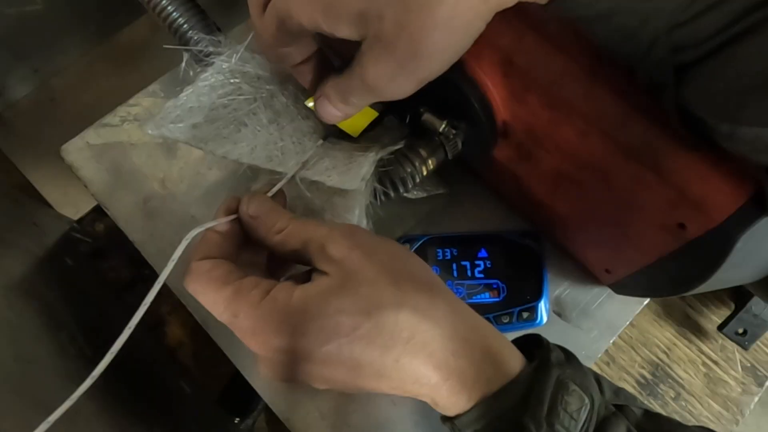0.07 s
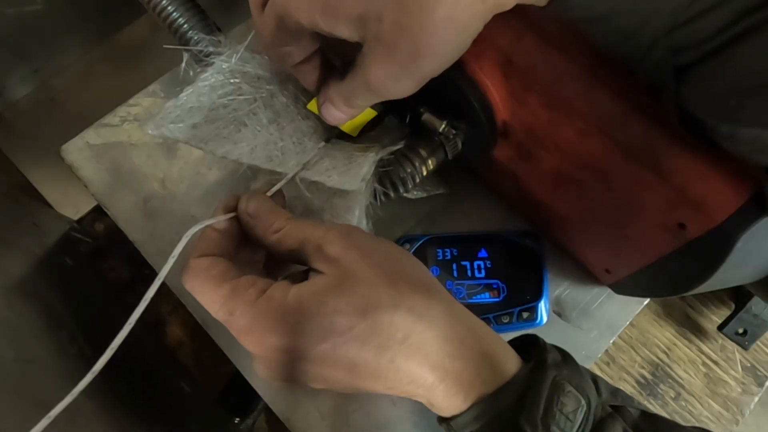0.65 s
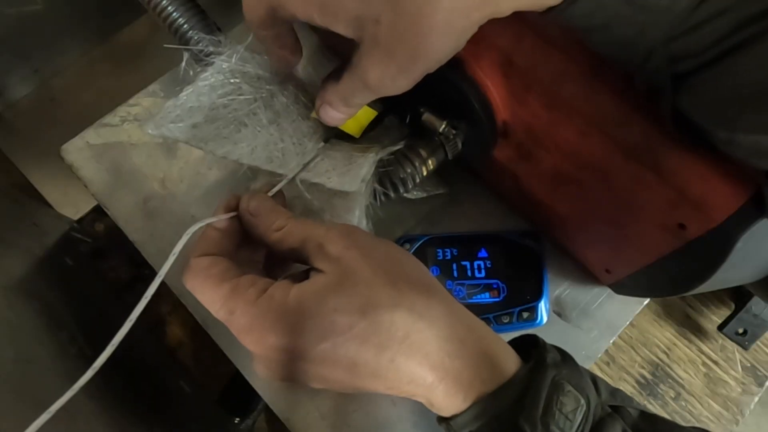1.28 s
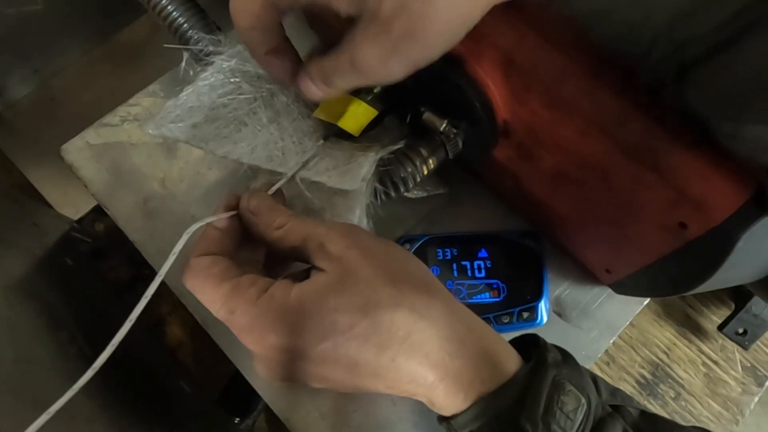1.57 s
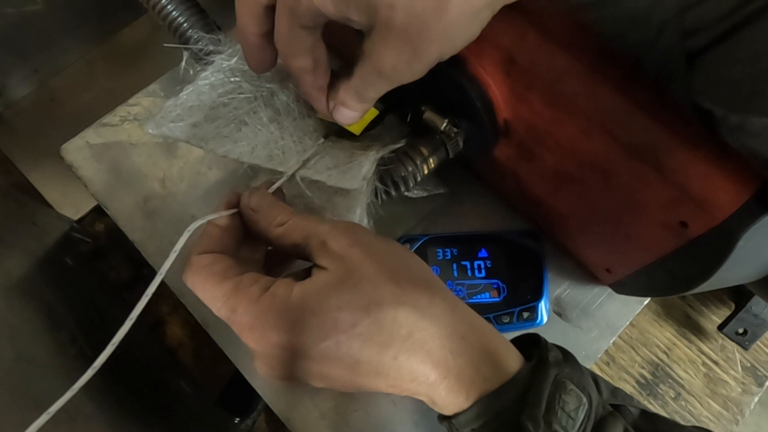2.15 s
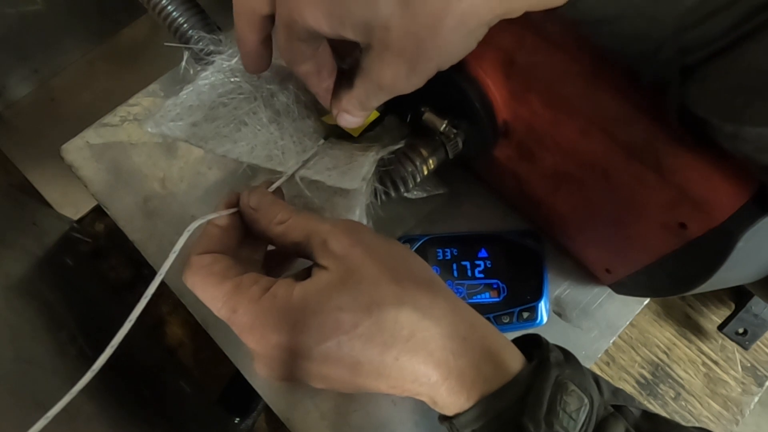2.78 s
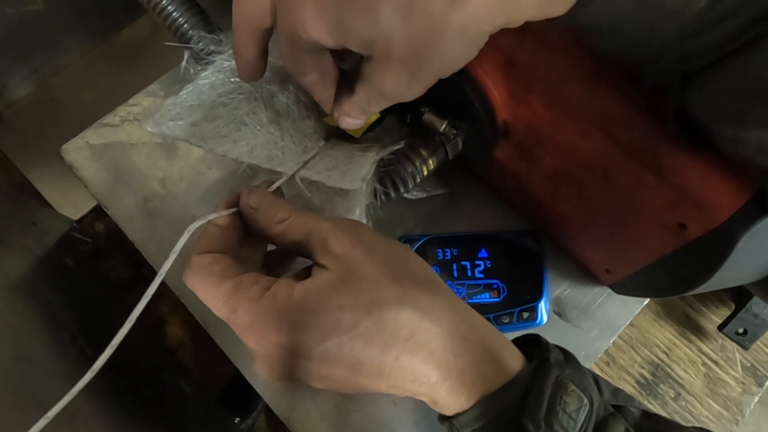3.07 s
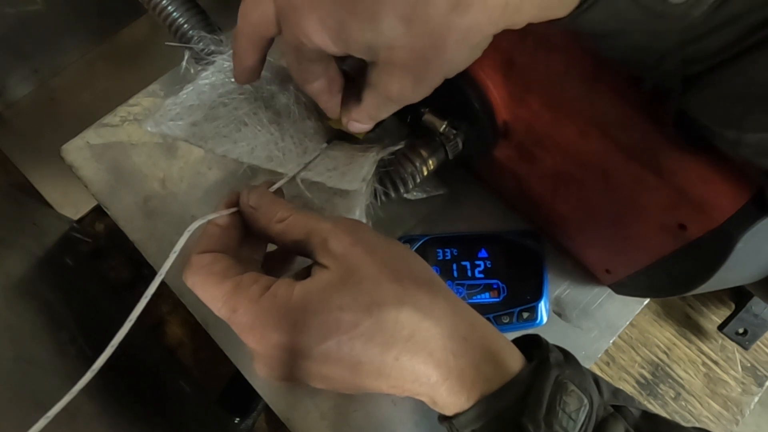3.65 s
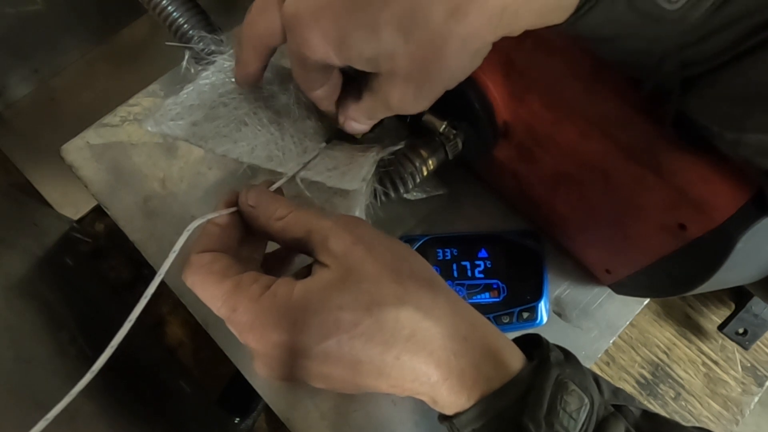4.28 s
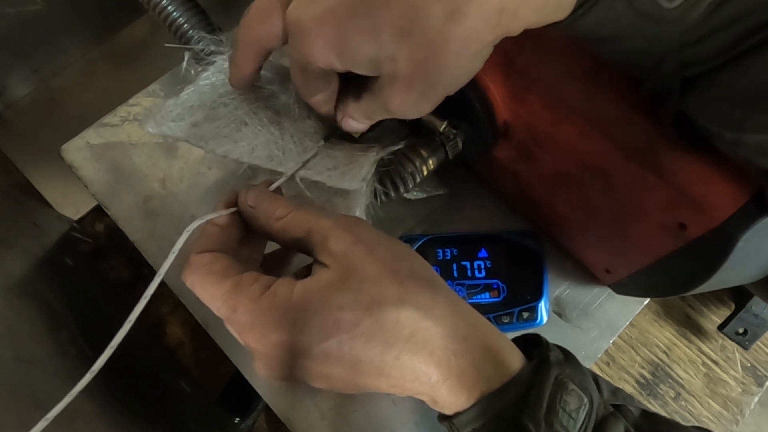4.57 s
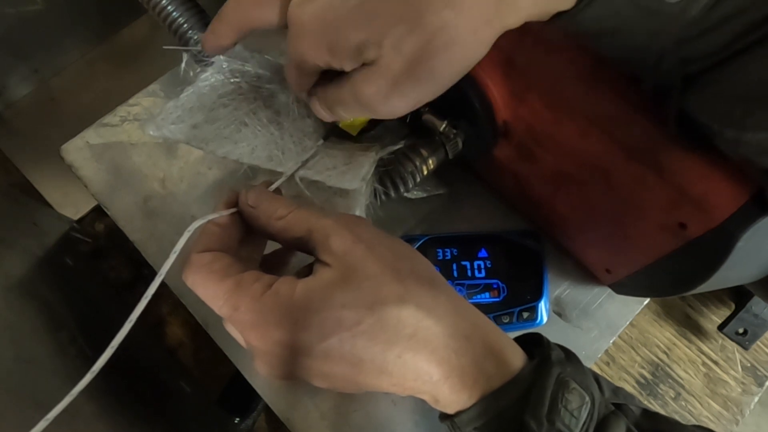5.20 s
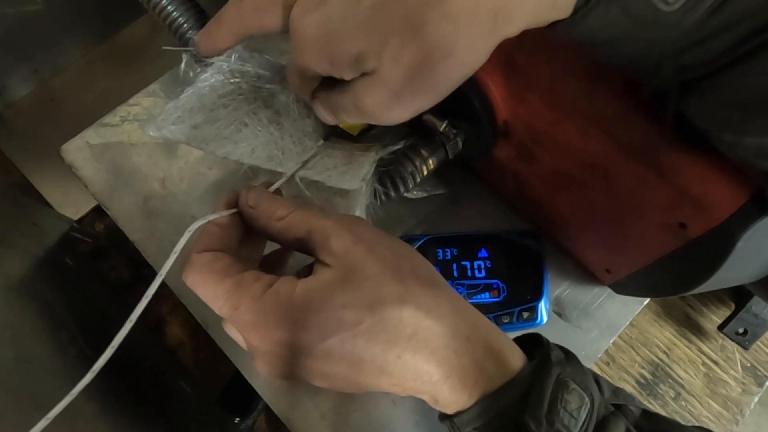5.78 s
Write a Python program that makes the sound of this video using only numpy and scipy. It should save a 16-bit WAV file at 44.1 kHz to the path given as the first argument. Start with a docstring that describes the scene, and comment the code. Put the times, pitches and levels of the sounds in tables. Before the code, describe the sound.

A diesel air heater burns close to the microphone in a workshop. Its flame makes a deep, throbbing rumble that falters briefly a few times a second and picks up again at once. Above it, the blower holds a steady, high, many-toned whine with rushing, hissing air. A faint airy whistle at the openings fades as a hand shields them, while the heater runs on.

```python
"""A diesel air heater's flame throbs on a low resonance of burner and exhaust pipe, close by.
It burns over a turbulent roar and falters a few times a second. The blower turns at about 4000 rpm
and whines in many shaft orders. Air rushes through it, hums in the duct, hisses in the housing
and whistles at the openings, which a hand gradually shields."""
import sys
import numpy as np
from scipy.fft import rfft, irfft, next_fast_len
from scipy.io import wavfile
from scipy.ndimage import map_coordinates

SR = 44100
rng = np.random.default_rng(int(sys.argv[2]) if len(sys.argv) > 2 else 0)


def int16_out(signal):
    """Quantize to a 16-bit WAV file."""
    q = np.round(np.clip(np.atleast_2d(signal).T, -1, 1) * 32767)
    wavfile.write(sys.argv[1], SR, q.astype(np.int16))


N = 266231


# Flame drive and pipe resonance: time_s, level_db, pitch_hz
BURN = [(0, -16, 95.4), (.5, -13.5, 95.5), (1.1, -18.5, 94.8), (1.45, -15.5, 95.33), (1.7, -17, 94.35),
        (2.45, -17, 93.3), (3.0, -14.5, 92.34), (3.45, -16.5, 92.9), (3.98, -18, 93.16), (4.22, -15, 97.6),
        (4.5, -17.5, 94.3), (5.0, -15, 93.16), (5.3, -17.5, 94.5), (5.6, -15, 95.4), (6.04, -13, 92.4)]

def flame_throb(sag_db, flutter_db=3.0, jitter_hz=3.74, overtone=0.92, ceiling_db=-12.5, side_db=-28):
    """The flame locks onto the pipe resonance; strong swings saturate."""
    level_db, pitch_hz = curves(BURN)
    drive = amp(level_db + sag_db + flutter_db * wobble(100)) * np.sqrt(2)
    swing = drive / (1 + (drive / amp(ceiling_db)) ** 4) ** (1 / 4)
    looseness = amp(-sag_db)  # a weak oscillation keeps time less well
    phase = 2 * np.pi * np.cumsum(pitch_hz + jitter_hz * looseness * wobble(70)) / SR
    throb = swing * np.cos(phase) - overtone * swing ** 2 * np.cos(2 * phase)  # sharp troughs
    side = amp(side_db) * swing * np.sin(phase)
    return np.array([throb + side, throb - side])


# Flame falters: start_s, depth_db, length_s
FALTERS = [(0.128, 10.5, 0.037), (0.284, 9.5, 0.053), (.6, 20, 0.073), (0.748, 12, 0.05),
           (0.833, 10, 0.063), (0.937, 8.5, 0.052), (1.165, 8, 0.072), (1.349, 11, 0.075),
           (1.628, 7.5, 0.075), (1.711, 7.5, 0.031), (1.802, 13.5, 0.036), (1.983, 6.5, 0.036),
           (2.214, 8, 0.043), (2.388, 8.5, 0.043), (2.681, 21, 0.049), (2.853, 13, 0.052),
           (2.938, 18.5, 0.066), (3.114, 15, 0.056), (3.627, 17, 0.047), (3.75, 9, 0.044),
           (4.015, 9, 0.037), (4.148, 8.5, 0.022), (4.301, 10, 0.083), (4.609, 8, 0.069),
           (4.731, 6.5, .055), (5.178, 9.5, 0.067), (5.348, 11, 0.16), (5.649, 22, 0.049),
           (5.788, 18.5, 0.099)]

def falter_db(flare_delay_s=0.065, flare_s=0.056, flare_share=0.17):
    """The flame sags at each falter, then the unburnt fuel flares up."""
    sag_db = np.zeros(N)
    for start_s, depth_db, length_s in FALTERS:
        centre_s = start_s + length_s / 2
        flare = flare_share * bump(centre_s + flare_delay_s, flare_s)
        sag_db += depth_db * (flare - bump(centre_s, length_s))
    return sag_db


# Combustion spectrum: freq_hz, density_db
ROAR = [(10, -33), (22, -12), (36, -10), (55, -4), (80, 0), (110, -1.5), (148, 0), (200, -10.5),
        (228, -11.5), (262, -15), (285, -18), (340, -23), (520, -36.5), (1000, -73)]

def flame_roar(sag_db):
    """Turbulent combustion, dipping slightly at each falter."""
    return amp(-24 + 0.084 * sag_db) * noise(spectrum(ROAR))


# Blower shaft speed: time_s, speed_hz
SHAFT_SPEED = [(0, 66.59), (.6, 66.55), (1.0, 66.68), (1.5, 66.75), (2.15, 66.51), (3.3, 66.57),
               (3.75, 66.69), (5.1, 66.735), (5.75, 66.56), (6.04, 66.6)]

def shaft_angle_rad():
    """The shaft turns at a slightly drifting speed."""
    return 2 * np.pi * np.cumsum(curves(SHAFT_SPEED)[0]) / SR


# Blower swell, scaled by each layer: time_s, level_db
SWELL = [(0, -33.5), (.8, -34), (1.3, -32), (1.75, -34), (2.8, -32.2), (3.45, -34.5), (3.95, -33.5),
         (4.5, -34), (5.15, -35), (5.5, -33.5), (6.04, -33.5)]
# Blower tones: shaft_order, level_db, left_minus_right_db
ORDERS = [(1, -36.2, 1), (4, -50.7, -2), (8, -57.3, 0), (9, -53.6, -4), (10, -55.1, -5), (11, -47.2, -6),
          (14, -55.4, -1), (15, -58.1, 0), (16, -58.5, -5), (17, -54.7, -7), (19, -59.6, 1), (20, -43.4, 2),
          (21, -53.6, 1), (22, -45.4, -3), (23, -41.7, -2), (24, -55.0, -2), (25, -60.0, -1),
          (26, -53.2, 0), (27, -57.7, 1), (29, -61.4, 2), (32, -57.1, 0), (33, -60.2, -1), (35, -58.0, 2),
          (38, -42.5, -2), (40, -41.2, 1), (41, -36.7, 0), (42, -51.3, 2), (43, -50.1, -6), (44, -41.8, -5),
          (45, -53.1, -4), (46, -55.8, -6), (47, -60.6, -7), (53, -64.2, 2), (64, -66.1, 2), (65, -60.9, 3),
          (66, -63.1, 3), (74, -67.2, 1), (76, -63.2, 0), (77, -64.5, 0), (78, -65.6, 0), (87, -65.2, -1),
          (89, -70.8, 2)]

def blower_whine(angle_rad, swell_db, waver_db=0.5, drift_db=0.54):
    """Shaft orders waver in the turbulent air; high orders are fuzzier."""
    whine = np.zeros((2, N))
    for order, level_db, pan_db in ORDERS:
        scatter_rad = 0.003 * wobble(40)
        tone = np.sqrt(2) * np.sin(order * (angle_rad + scatter_rad) + rng.uniform(0, 2 * np.pi))
        tone *= amp(level_db + waver_db * wobble(14) + drift_db * wobble(1.56))
        whine += pan(tone, pan_db)
    return from_right(whine * amp(0.69 * swell_db), lead_ms=0.044)


# Blower airflow spectrum: freq_hz, density_db
RUSH = [(150, -30), (350, -4), (540, -1), (750, 2.5), (980, 0.5), (1070, -3), (1250, 3), (1600, 1.5),
        (1830, -4.5), (2100, -7), (2450, -3), (2630, 3), (3000, -3.5), (3500, -21)]

def air_rush(angle_rad, swell_db, chop_db=0.5):
    """Air rushes through the blower, chopped once a turn."""
    level_db = -36 + 0.44 * swell_db + chop_db * np.cos(angle_rad) + 0.61 * wobble(12)
    rush = amp(level_db) * noise(spectrum(RUSH))
    return pan(from_right(rush, lead_ms=0.025), left_minus_right_db=-1)


# Duct modes: freq_hz, width_hz, gain_db
DUCT_MODES = [(297, 5.9, -4), (368, 15, -9.5), (385, 7.9, -7.5), (411.6, 39, 2), (446, 10.4, -1.5)]

def duct_hum(swell_db):
    """Airflow excites the duct's low modes."""
    level_db = -42 + 1.6 * swell_db + 0.82 * wobble(5)
    return amp(level_db) * noise(lambda hz: ringing(DUCT_MODES, hz) * rolloff(hz, 700, order=4))


# Outlet air spectrum: freq_hz, density_db
HISS = [(1500, -21), (3200, 7), (3420, 1.5), (3700, 4), (4100, -1), (4700, -1.5), (5500, -4.5), (6500, -9),
        (6900, -6), (7700, -10), (8800, -26), (11000, -49)]
# Duct and housing modes: freq_hz, width_hz, gain_db
HOUSING_MODES = [(3605, 54, -3.5), (4330, 84, 1.5), (4960, 54, 6), (5216, 110, 2.5), (5670, 42, -4),
                 (6300, 160, -10)]

def housing_hiss(swell_db):
    """Air hisses out of the housing and excites its high modes."""
    hiss = amp(-47 + 0.83 * swell_db) * noise(spectrum(HISS))
    ring_db = -48.7 + 1.74 * swell_db + 0.7 * wobble(7.3)
    ring = amp(ring_db) * noise(lambda hz: ringing(HOUSING_MODES, hz) * rolloff(hz, 7500, order=12))
    return from_right(hiss + ring, lead_ms=0.0035)


# Whistle level as the hand shields the openings: time_s, level_db
EXPOSURE = [(0, -48), (.6, -48.5), (1.1, -44.5), (1.6, -46), (1.95, -47), (2.3, -49), (3.0, -49.5),
            (3.6, -53), (4.95, -56), (5.25, -59), (6.04, -56)]
# Modes of the openings: freq_hz, width_hz, gain_db
WHISTLE_MODES = [(2390, 134, 9.5), (5900, 130, 1), (7270, 110, -2.5), (10370, 260, -11)]

def whistles():
    """Airy whistles at the openings, fading behind the hand."""
    level_db, = curves(EXPOSURE)
    return amp(level_db) * noise(lambda hz: ringing(WHISTLE_MODES, hz) * rolloff(hz, 11500, order=16))


# Modes of the hollow under the hand, applied twice: freq_hz, width_hz, gain_db
HOLLOW_MODES = [(5160, 380, 0), (6490, 520, 1)]

def hand_hollow(open_db):
    """The hollow rings louder as the hand closes over the opening."""
    ring = amp(-59 - 0.37 * open_db) * noise(lambda hz: ringing(HOLLOW_MODES, hz) ** 2)
    return from_right(ring, lead_ms=0.0035)


# Top-octave air spectrum: freq_hz, density_db
FIZZ = [(6000, -21), (8200, 2), (9200, -2), (10400, 2), (11500, -0.5), (13000, -6.5), (13800, -13)]

def air_fizz(open_db):
    """The finest air noise, slightly shielded by the hand."""
    return amp(-61 + 0.14 * open_db + 0.43 * wobble(15)) * noise(spectrum(FIZZ))


# Stereo width of the noise: freq_hz, side_minus_mid_db
WIDTH = [(25, -13), (70, -22), (150, -24), (350, -20), (660, -7.5), (1200, -20), (2200, -11), (3700, -7),
         (5100, -22), (7000, -8.5), (8800, -13), (10600, -28), (12200, -6)]

def noise(colour):
    """Coloured stereo noise of rms 1, nearly mono in the bass."""
    white = rng.standard_normal((2, N))
    mid, side = filtered(white, lambda hz: colour(hz) * amp([0 * hz, along(WIDTH, hz)]))
    stereo = np.array([mid + side, mid - side])
    return stereo / np.sqrt(np.mean(stereo ** 2))


def amp(db):
    return 10 ** (np.asarray(db) / 20)


def along(points, hz):
    """Interpolate (freq_hz, value) points on a log axis."""
    freq_hz, values = np.transpose(points)
    return np.interp(np.log(hz + 1), np.log(freq_hz + 1), values)


def curves(rows):
    """One value per sample for each column after time_s."""
    time_s, *columns = np.transpose(rows)
    return [np.interp(np.arange(N) / SR, time_s, column) for column in columns]


def wobble(rate_hz):
    """Smooth random curve, rate_hz knots a second."""
    grid = np.arange(0, N + 64, 64)
    knots = rng.standard_normal(4096)
    return np.interp(np.arange(N), grid, map_coordinates(knots, [grid * rate_hz / SR], mode="mirror"))


def bump(centre_s, width_s):
    """Bell of height 1, width_s wide at half height."""
    return 0.5 ** np.minimum((2 * (np.arange(N) / SR - centre_s) / width_s) ** 2, 20)


def filtered(x, response):
    """Apply a complex frequency response."""
    size = next_fast_len(N + SR // 2)
    return irfft(rfft(x, size) * response(np.fft.rfftfreq(size, 1 / SR)), size)[..., :N]


def rolloff(hz, corner_hz, order):
    return 1 / (1 + (hz / corner_hz) ** order)


def spectrum(points):
    """Response through (freq_hz, density_db) points, falling above the last."""
    return lambda hz: amp(along(points, hz)) * rolloff(hz, 2 * points[-1][0], order=4)


def ringing(modes, hz):
    """Gain of resonances summed in power."""
    gains = [amp(gain_db) * hz * width_hz / (freq_hz ** 2 - hz ** 2 + 1j * hz * width_hz)
             for freq_hz, width_hz, gain_db in modes]
    return np.linalg.norm(gains, axis=0)


def pan(x, left_minus_right_db):
    return x * amp([[left_minus_right_db / 2], [-left_minus_right_db / 2]])


def from_right(x, lead_ms):
    """The sound arrives earlier on the right."""
    return filtered(x, lambda hz: np.exp(1j * np.pi * hz * lead_ms / 1000 * np.array([[-1], [1]])))


def scene():
    """Flame, blower and airflow run together."""
    sag_db, angle_rad = falter_db(), shaft_angle_rad()
    blower_db, = curves(SWELL)
    swell_db = blower_db - blower_db.mean()
    exposure_db, = curves(EXPOSURE)
    open_db = exposure_db - exposure_db.mean()
    flame = flame_throb(sag_db) + flame_roar(sag_db)
    whine = blower_whine(angle_rad, swell_db)
    air = air_rush(angle_rad, swell_db) + duct_hum(swell_db) + housing_hiss(swell_db)
    openings = whistles() + hand_hollow(open_db) + air_fizz(open_db)
    return flame + whine + air + openings


def record(dry, top_hz=13750):
    """Brick-wall low-pass."""
    return filtered(dry, lambda hz: hz < top_hz)


dry = scene()
out = record(dry)
int16_out(out)
```